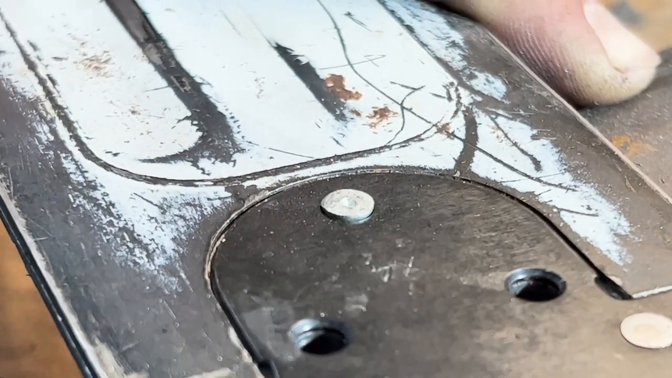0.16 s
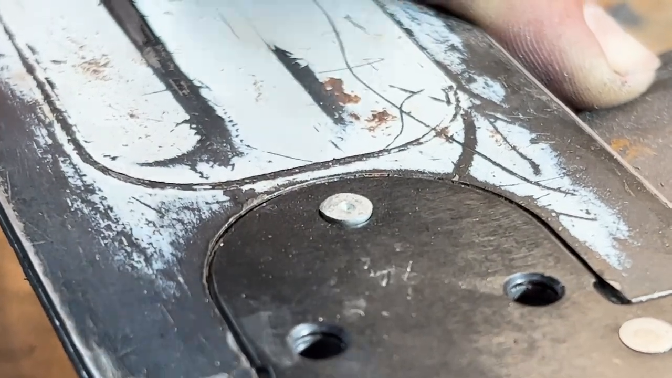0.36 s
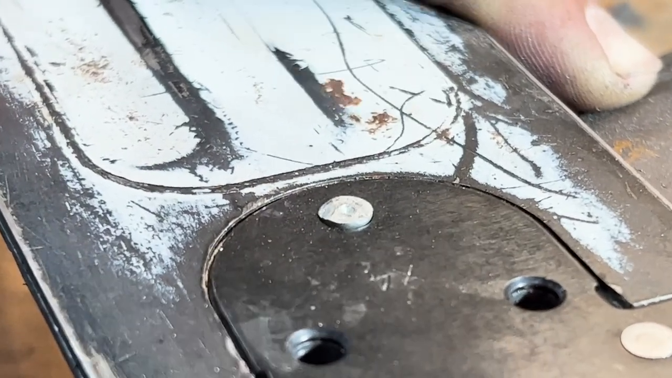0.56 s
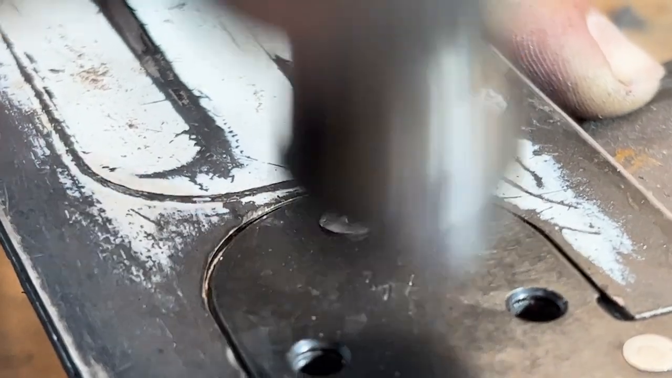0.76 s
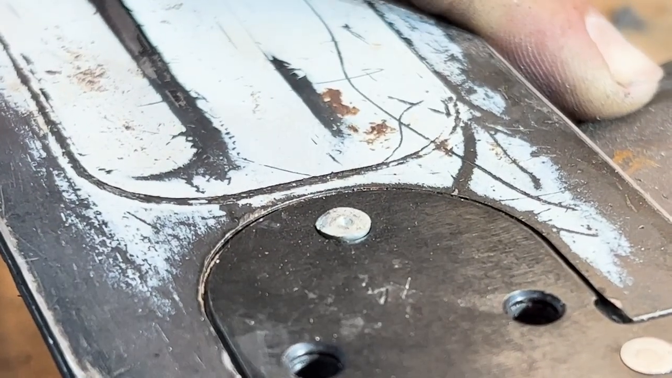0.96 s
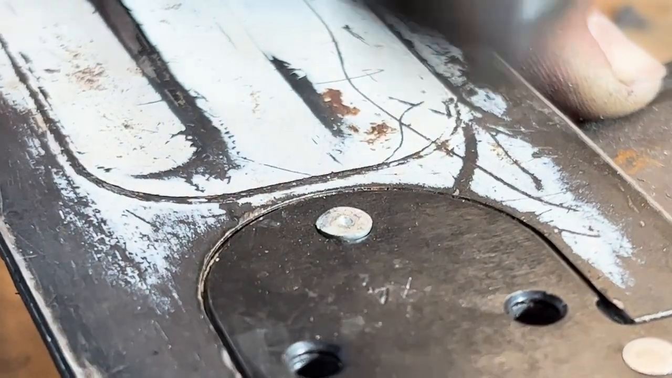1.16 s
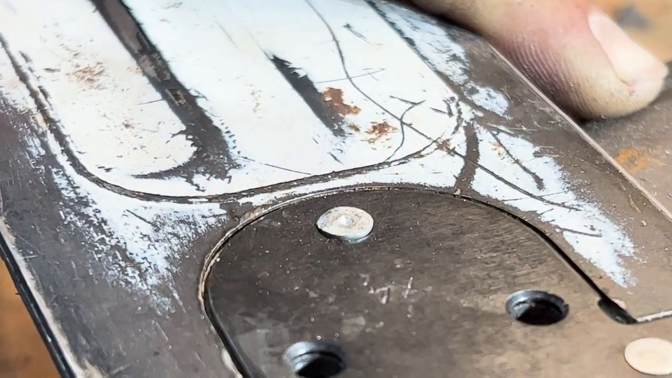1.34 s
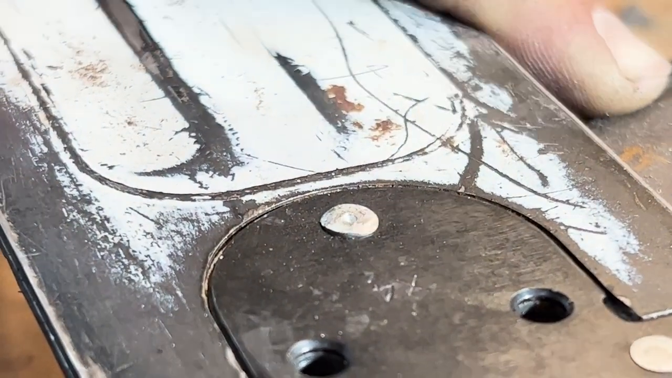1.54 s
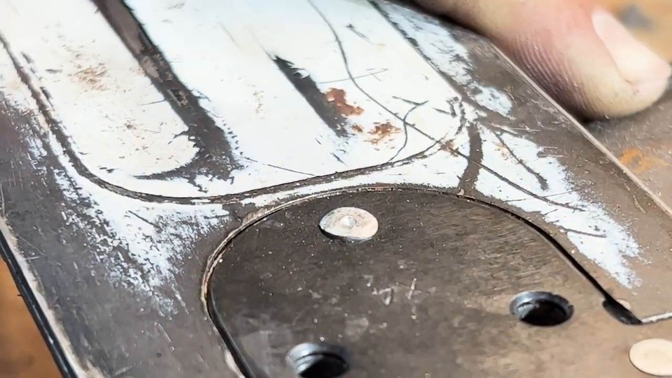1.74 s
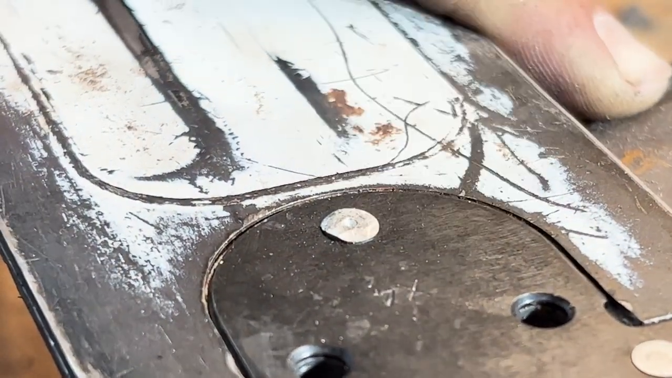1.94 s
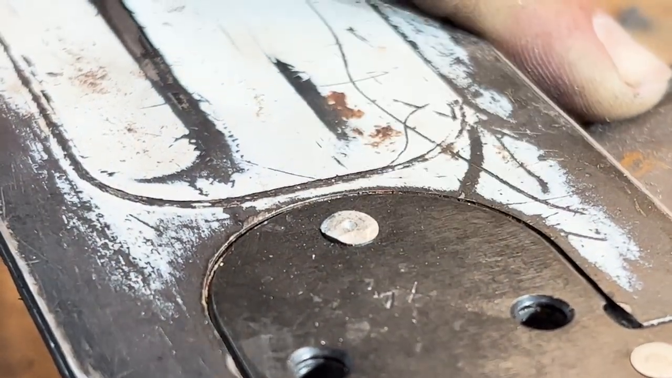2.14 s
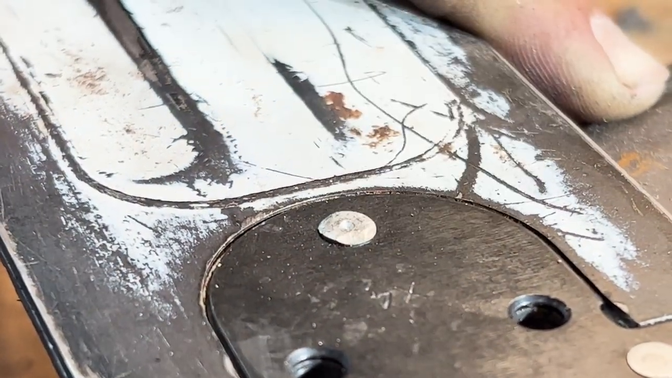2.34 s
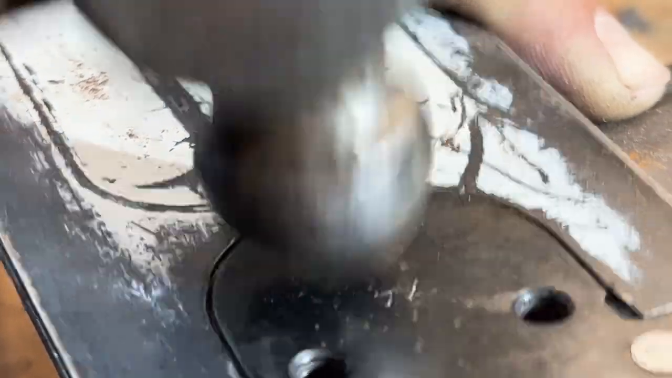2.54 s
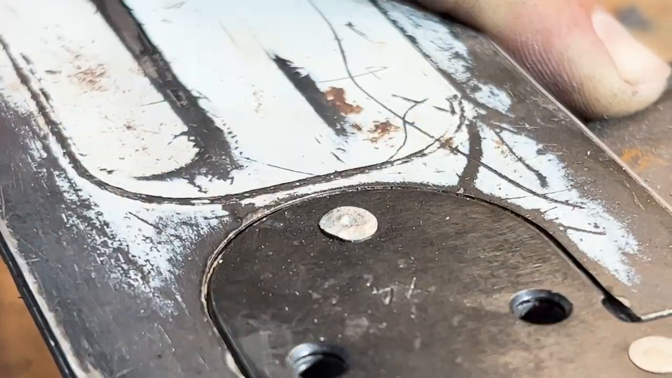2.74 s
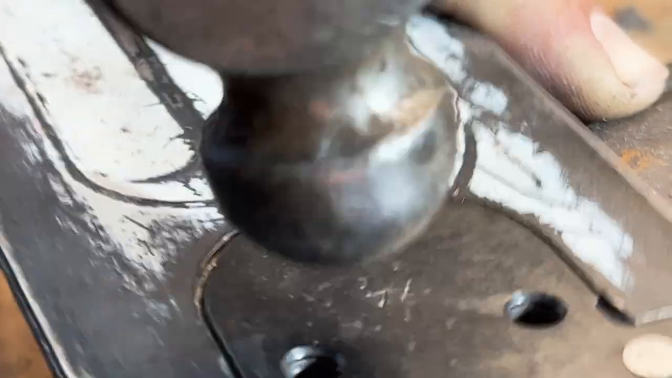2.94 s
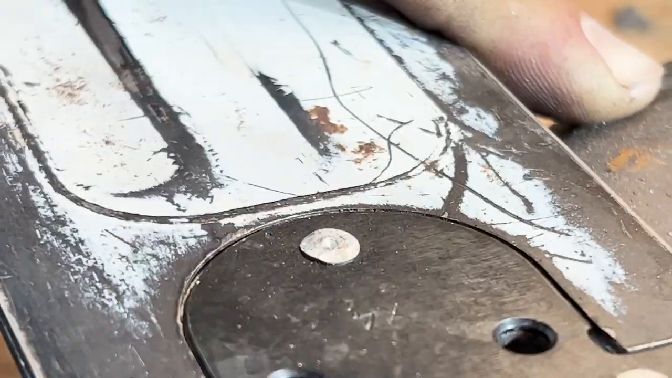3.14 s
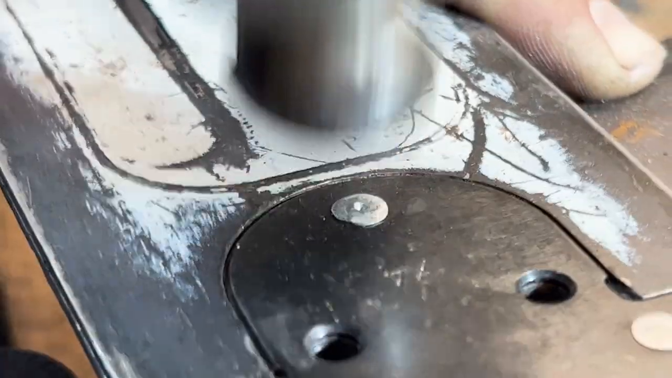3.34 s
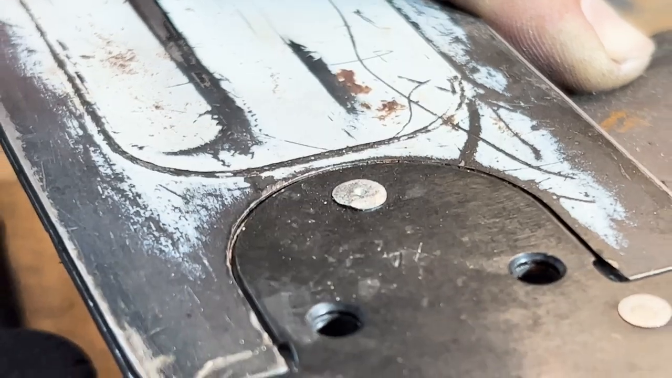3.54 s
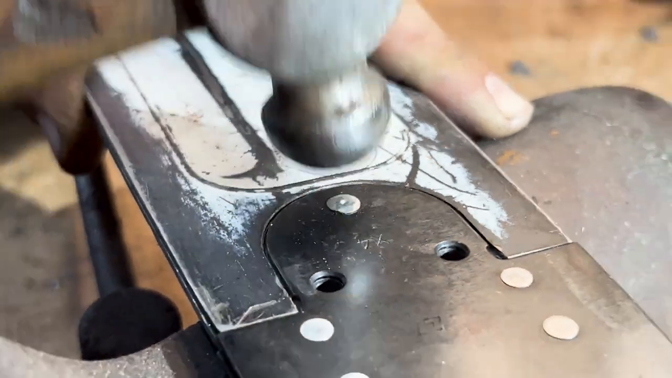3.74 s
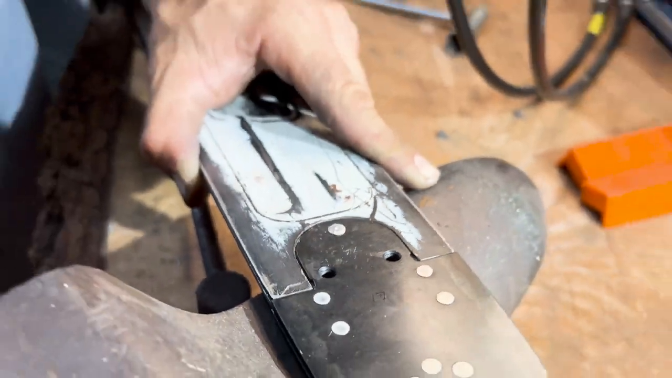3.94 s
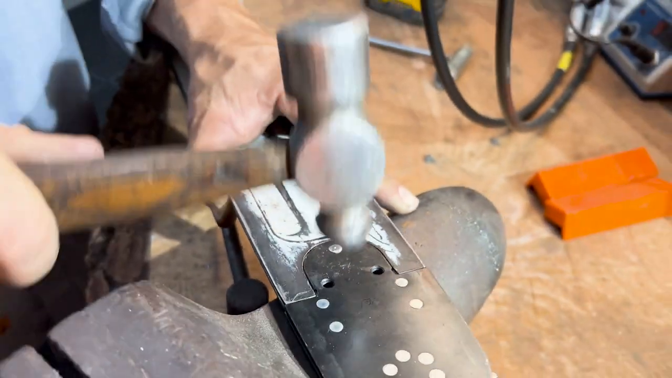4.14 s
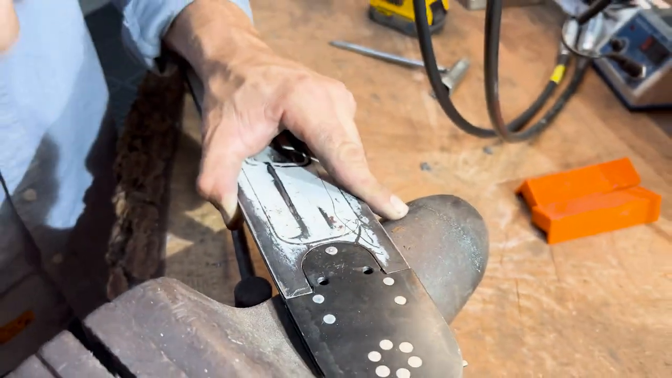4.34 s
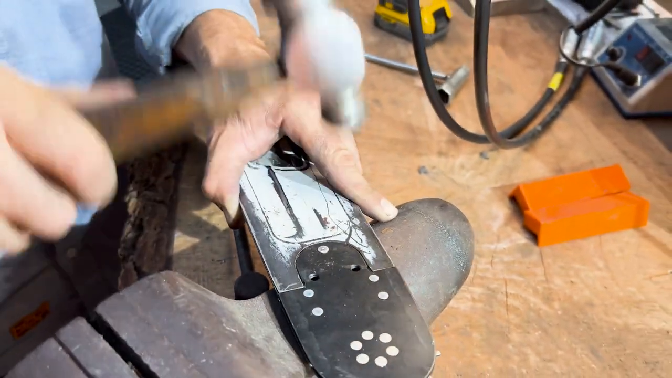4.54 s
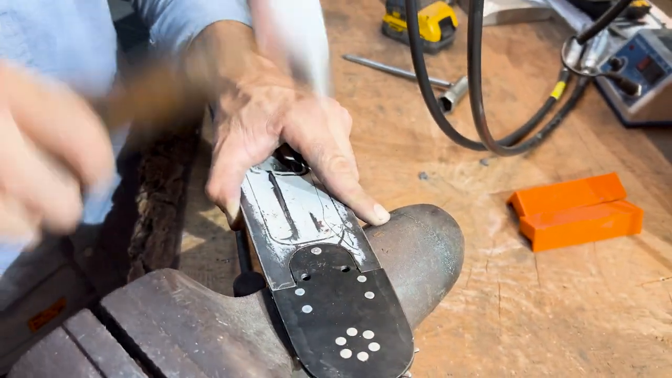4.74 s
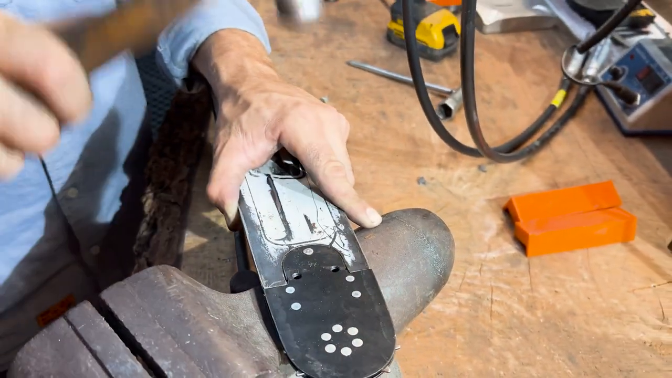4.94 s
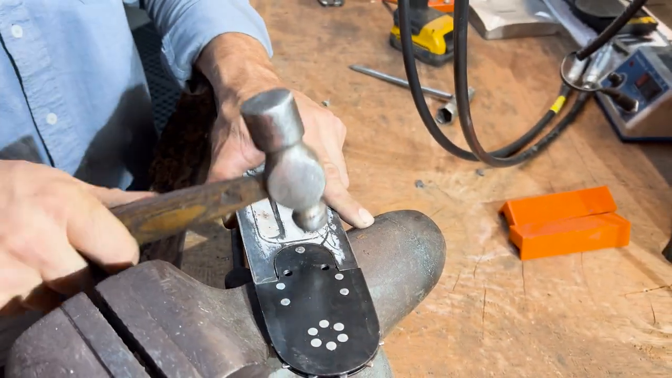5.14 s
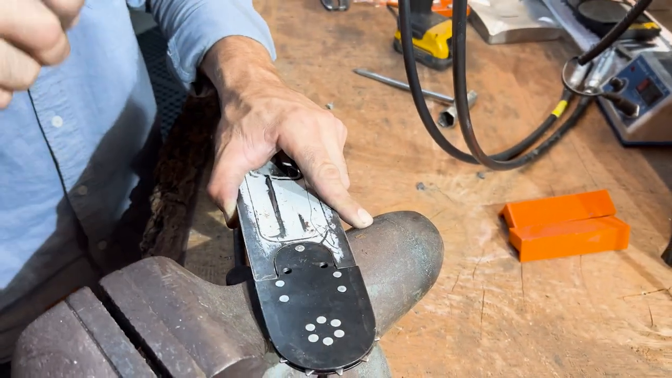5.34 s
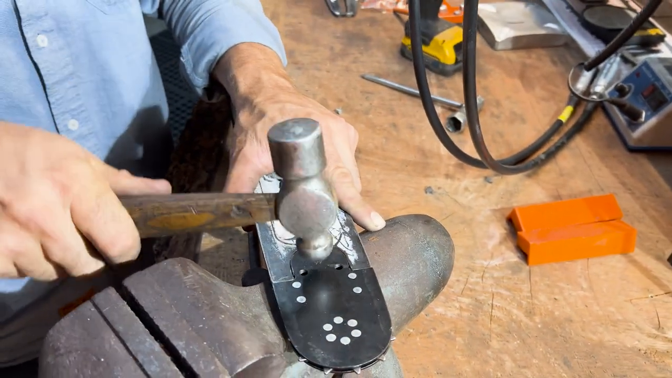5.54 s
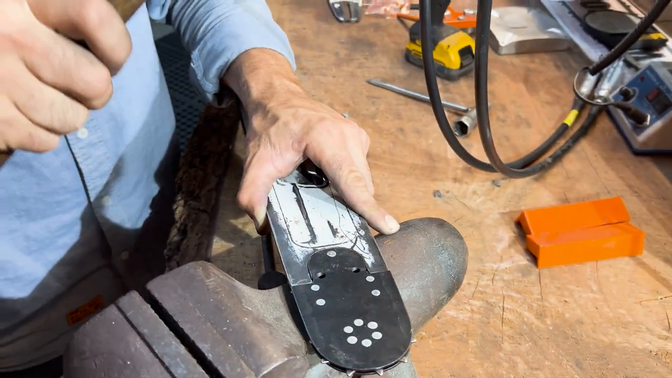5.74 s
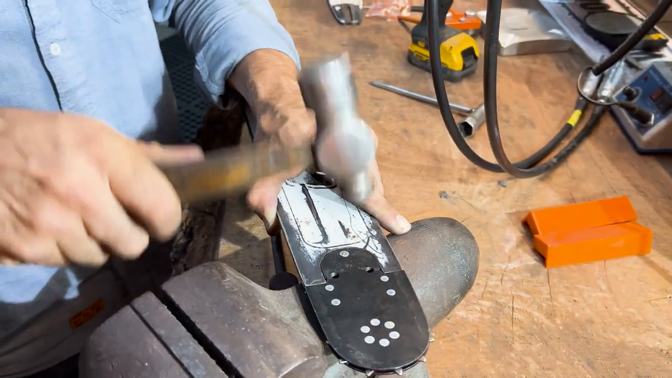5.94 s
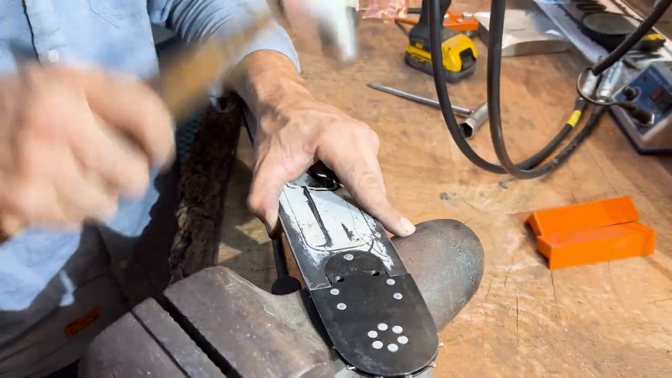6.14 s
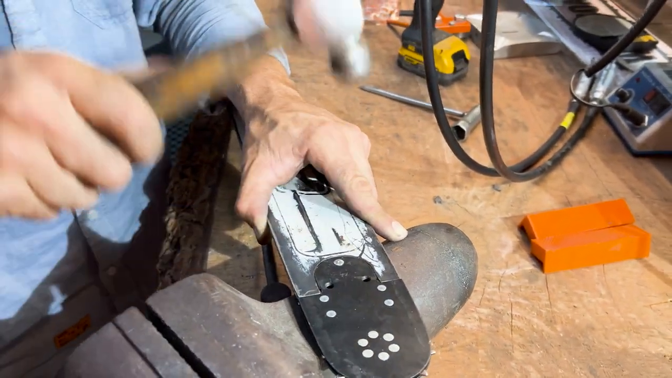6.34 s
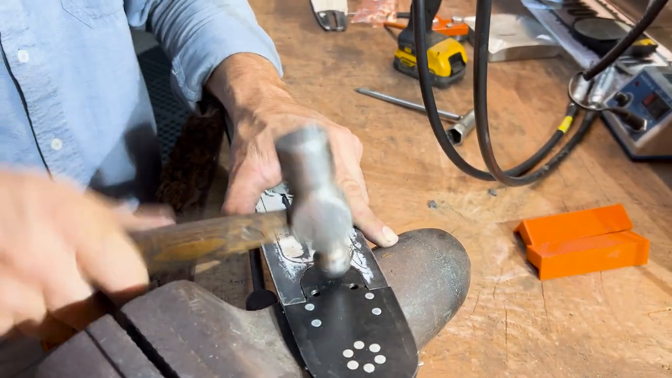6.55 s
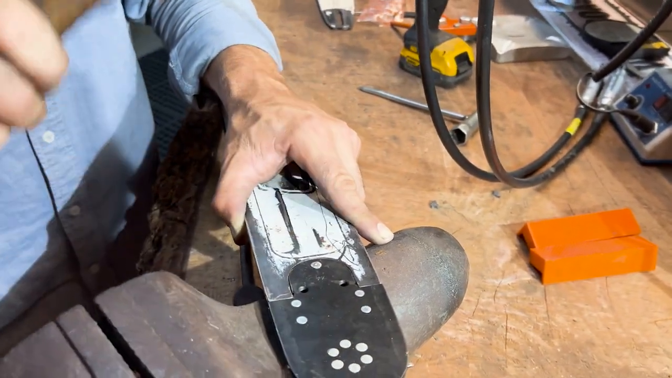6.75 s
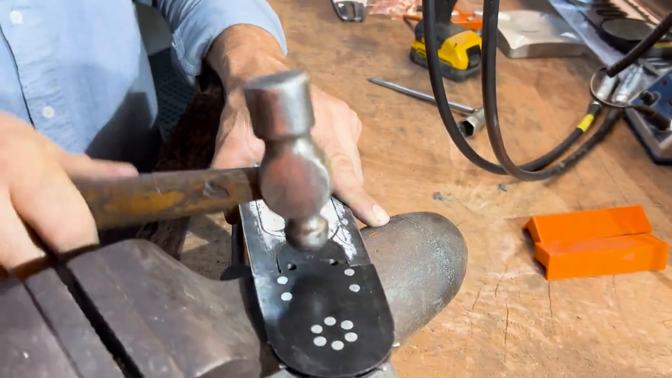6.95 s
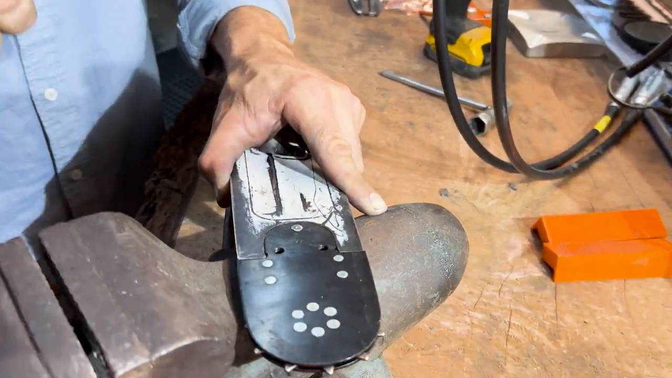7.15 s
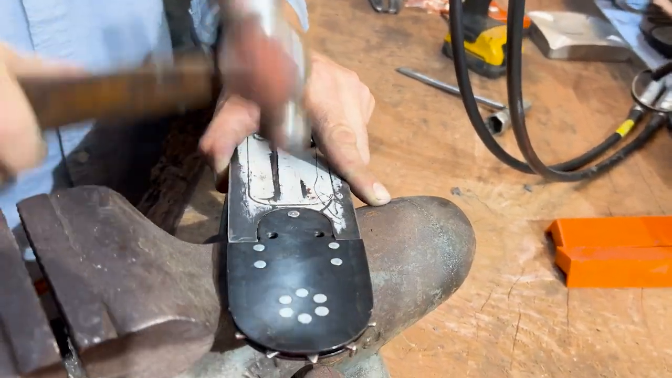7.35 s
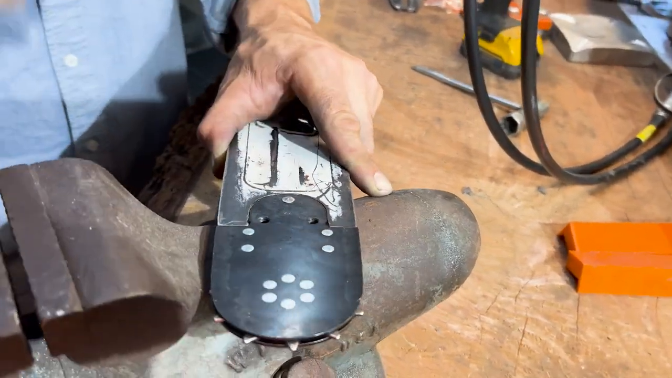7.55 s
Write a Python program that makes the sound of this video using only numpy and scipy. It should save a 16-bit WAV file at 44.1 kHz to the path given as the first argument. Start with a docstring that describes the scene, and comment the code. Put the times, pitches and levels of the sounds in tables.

```python
"""Sharp steel taps, nearly three a second: a ball-peen hammer on a rivet in a flat bar lying on a vise.
Each blow cracks, rings bar and vise, and thumps the wooden bench. The loose bar chatters and, after
most blows, jumps and slaps back; now and then the bench rocks with a low hum. The workshop answers with
a short tail. The microphones listen in a narrow beam, then open wide halfway through."""
import sys
import numpy as np
from scipy import signal
from scipy.fft import rfft, irfft, next_fast_len
from scipy.io import wavfile

SR = 44100
rng = np.random.default_rng(int(sys.argv[2]) if len(sys.argv) > 2 else 0)


def wav_record(signal):
    """Record a signal, one row per channel, as 16-bit PCM in the file named by sys.argv[1]."""
    frames = np.transpose(np.atleast_2d(signal))
    bounded = np.clip(frames, -1, 1)
    # unit amplitude maps onto the largest positive 16-bit level
    quanta = np.round(bounded * 32767).astype(np.int16)
    wavfile.write(sys.argv[1], SR, quanta)


N = 334719

# Noise colours: (frequency [Hz], level per Hz [dB])
AIR_COLOUR = [(30, -25), (60, -3), (100, 0), (360, -2), (1000, -6), (3000, -22), (7000, -34), (9000, -50),
              (16000, -70)]  # still room
CRACK_COLOUR = [(150, -13.5), (500, -3.5), (1000, 2), (1700, -6), (3500, -5.5), (6000, -7.5), (9000, -4),
                (13000, -4.5), (15500, -5), (16200, -24.5), (16900, -53)]  # body of the hit
SNAP_COLOUR = [(1500, -30.5), (4000, -17.5), (9000, 2.5), (15500, 5), (16200, -26), (16900, -28.5)]  # first touch of steel on steel
CHATTER_COLOUR = [(150, -6.5), (500, 1.5), (1200, 0), (3300, -7), (7000, -9), (10000, -10), (15500, -15.5),
                  (16500, -47.5)]  # loose bar
# Ringing modes of bar and vise: (frequency [Hz], level [dB], t60 [s])
BAR_MODES = [(790, -20.5, 0.04), (1100, -4, 0.014), (1428, -6, 0.16), (1468, 4.5, 0.037),
             (1512, 1.5, 0.028), (1593, -5.5, 0.023), (1752, -3.5, 0.034), (2930, -9.5, 0.021),
             (3596, -17, 0.01), (3317, -9.5, 0.018), (4500, -20, 0.04), (5920, -15, 0.024),
             (6480, -27, 0.013)]
VISE_MODES = [(210.4, -6.5, 0.078), (279, -4.5, 0.054), (324.3, 0, 0.071), (362.3, 1, 0.096),
              (443, -13, 0.009), (577, -8.5, 0.072)]
# Weight of the bench thump: (frequency [Hz], level per Hz [dB])
THUMP_COLOUR = [(20, -33), (45, 3), (85, 7), (200, -7), (400, -21.5), (1000, -49)]
# Workshop tail: (frequency [Hz], t60 [s], level [dB])
ROOM_TAIL = [(30, 0.77, -3.5), (60, 0.19, 0.5), (200, 0.32, 9.5), (342, 0.71, 7), (556, 0.44, 8),
             (1000, 0.96, 4.5), (2500, 0.91, 0.5), (7560, 0.73, -3), (10000, 0.41, -0.5),
             (16000, 0.49, -15)]
# Hits, the last four columns relative to the hit's level:
# (time [s], level [dB], bar ring [dB], bar clink [dB], vise [dB], thump [dB])
HAMMER_BLOWS = [(0.0339, -15, -13.5, -4, -13.5, -14), (0.4058, -13, -14, -11, -22, -22.5),
                (0.7646, -15.5, -10, -13, -11.5, -15), (1.1263, -14.5, -13.5, -12, -11, -21),
                (1.475, -16, -14.5, -9, -15, -30.5), (1.8372, -18, -15.5, 0.5, -10.5, -30.5),
                (2.1956, -15.5, -11, -7, -12, -13.5), (2.5651, -16, -8, -9, -19.5, -37.5),
                (2.9648, -15, -9, -26, -21.5, -25), (3.3776, -15, -10.5, -7.5, -14, -19),
                (3.7278, -14.5, -10, -23, -21.5, -18), (4.1, -22.5, -35.5, -9, -11, -31.5),
                (4.46, -22.5, -42.5, -19.5, -11.5, -16.5), (4.807, -22, -27, -7, -8.5, -23),
                (5.1602, -20, -7.5, -8, -16.5, -30), (5.5147, -22.5, -46, -6, -12, -18.5),
                (5.8738, -22.5, -32.5, 0.5, -11, -21.5), (6.222, -24.5, -16, -13, -13, -20.5),
                (6.5829, -24, -25, -12, -14, -22), (6.9297, -21, -11, -24, -12.5, -22.5),
                (7.2775, -21.5, -17.5, -20, -9, -16.5)]
AFTER_SOUNDS = [(0.0823, -16.5, -8.5, -15, -24.5, -21.5), (0.4415, -19.5, -4.5, -2.5, -25.5, -9.5),
                (0.8097, -17.5, -14, 4.5, -24, -21.5), (1.1698, -19, -10, -13, -19, -23),
                (1.503, -17.5, -5.5, 5.5, -28, -25), (1.5113, -25, -19, -3.5, -14.5, -22.5),
                (1.5253, -28.5, -26.5, -4, -24.5, -29), (1.8699, -17.5, -7.5, -2.5, -21, -26),
                (2.2357, -16, -9.5, -16.5, -21.5, -27), (2.5765, -24.5, -2.5, 8, -10.5, -38),
                (2.5832, -20.5, -16, -11.5, -36.5, -41), (2.586, -20, -20, 4, -28.5, -33.5),
                (2.5896, -20, -1.5, -1.5, -14, -36.5), (3.0199, -38.5, -8.5, 8.5, -10, -19),
                (3.4187, -21, -6, 3, -21, -12), (3.7645, -20, -2.5, -0.5, -14.5, -18),
                (4.1122, -38.5, -10, -2, 4, -7), (4.511, -29.5, -13, -9, -13.5, -40),
                (5.2012, -39.5, -8, 3, -25.5, -16), (6.2561, -28.5, -15, -1.5, -34, -21),
                (6.5971, -40.5, -16, 5, -0.5, -14)]  # the bar slapping back, or a faint late ring of the vise
# Voicing of each kind of hit, relative to its level: (crack fall in 10 ms [dB], chatter [dB], room [dB])
BLOW_VOICING, AFTER_VOICING = (-26, -20, -18.5), (-11.5, -25.5, -26.5)
# Bench rocking on: (middle [s], half length [s], frequency [Hz], level [dB])
BENCH_SHUDDERS = [(.6, .06, 46, -50), (7.42, .08, 47, -57), (.13, .03, 55, -50)]
# Pick-up patterns: (frequency [Hz], left-right likeness [0-1], left over right [dB], colour [dB])
NARROW_BEAM = [(60, 0.94, 0.5, -3.5), (300, 0.92, -0.5, 3.5), (800, 0.88, 1, 0.5), (1490, 0.95, 0.5, -3),
               (2290, 1, 0, 1), (16000, 1, -1.5, -2.5)]
WIDE_PATTERN = [(60, 0.91, 0, 0.5), (323, 0.78, 0.5, 4), (650, 0.17, 1.5, 4), (3000, 0.14, -0.5, 8),
                (4050, 0.074, 2.5, 8), (4870, 0.065, -1.5, 9.5), (5250, 0.07, 9.5, 4.5),
                (6880, 0.28, -1.5, 11), (7500, .15, 27, -6), (8400, 0.36, 1.5, 2.5), (11240, 1, -0.5, 2),
                (16000, 0.72, 2, 1)]
# Phase between the channels: (frequency [Hz], left lead [rad])
LEFT_LEAD = [(30, 0), (500, .2), (2050, 0), (3300, .6), (5000, .45), (5850, -.65), (6800, -.1), (8300, -1),
             (9300, -2.55), (10200, -3.2), (11500, -4.45), (13000, -6), (14500, -7.2), (16200, -8.9)]
# The microphones open up: (time [s], share of the wide pattern [0-1])
OPENING = [(3.76, 0.15), (3.86, 1)]

WIDE_ROOM_DB, WIDE_CHATTER_DB = 6, 3.5  # the wide pattern hears more workshop and more chatter
DAMP_S, DAMP_DB = 0.016, -14.5  # damping of the bar's ring: time constant and final depth
THUMP_DELAY_S = 0.0032  # from contact to bench top
CLINK_ABOVE_HZ, TOP_HZ = 2500, 16950


def amp(db):
    return 10 ** (np.asarray(db) / 20)


def along(points, hz, column=1):
    """Read a table column along a log frequency axis."""
    table = np.array(points, float)
    return np.interp(np.log(hz + 1), np.log(table[:, 0] + 1), table[:, column])


def filtered(x, response):
    """Shape x with a complex frequency response."""
    size = next_fast_len(x.shape[-1] + 8192)
    return irfft(rfft(x, size) * response(np.fft.rfftfreq(size, 1 / SR)), size)[..., :x.shape[-1]]


def noise(colour, size):
    """Two unrelated coloured noises of rms 1."""
    x = filtered(rng.standard_normal((2, size)), lambda hz: amp(along(colour, hz)))
    return x / np.sqrt(np.mean(x ** 2) + 1e-20)


def onset(t, attack_s=0.00087):
    """The fast front edge of a noise burst."""
    return 1 - np.exp(-t / attack_s)


def still_air():
    """A faint, dark bed of room tone."""
    return amp(-75) * noise(AIR_COLOUR, N)


def steel_crack(t, fall_db):
    """Steel meets steel: a broad burst holds a moment, then drops; its bright snap dies sooner."""
    burst = amp(fall_db * (t / .01) ** 1.4)
    body = amp(-6.5) * noise(CRACK_COLOUR, len(t)) * burst
    snap = amp(-10.5) * noise(SNAP_COLOUR, len(t)) * burst ** 3
    return (body + snap) * onset(t)


def bar_chatter(t, t60=0.18):
    """The loose bar chatters on the vise: a fading rasp of noise."""
    return noise(CHATTER_COLOUR, len(t)) * amp(-60 * t / t60) * onset(t)


def ringing(modes, t, attack_s, detune, lift_db=0):
    """Damped modes, slightly detuned and at new strengths and phases for each hit and path."""
    hz, db, t60 = np.transpose(modes)[..., None]
    strength, phase, drift = rng.standard_normal((3, 2, len(modes), 1))
    hz = hz * (1 + detune * drift)
    envelopes = amp(db + lift_db + 2 * strength - 60 * t / t60)
    partials = envelopes * np.sin(2 * np.pi * hz * t + 1.33 * phase)
    return partials.sum(axis=1) * (1 - np.exp(-(t / attack_s) ** 2))


def bar_ring(t, ring_db, clink_db):
    """The bar's low modes ring and its high modes clink; they hold a moment, then are quickly damped."""
    lift_db = np.where(np.array(BAR_MODES)[:, :1] > CLINK_ABOVE_HZ, clink_db, ring_db)
    damping = amp(DAMP_DB * (1 - np.exp(-(t / DAMP_S) ** 2)))
    return damping * ringing(BAR_MODES, t, attack_s=0.0027, detune=0.007, lift_db=lift_db)


def vise_clunk(t):
    """The vise's low modes swell in just behind the bar."""
    return ringing(VISE_MODES, t, attack_s=0.01, detune=0.025)


def bench_thump(t, lag_at_100hz_s=0.0132, slope=0.2908):
    """A bending wave in the bench top: low frequencies travel slowest, so the thud glides down."""
    def bending(hz):
        cycles = lag_at_100hz_s * 100 * (hz / 100) ** slope / slope + hz * THUMP_DELAY_S
        return amp(along(THUMP_COLOUR, hz)) * np.exp(-2j * np.pi * cycles)

    wave = filtered(signal.unit_impulse(len(t)), bending)
    polarity = [[1], [rng.choice([-1, 1])]]  # the second path flips at random
    return wave / np.abs(wave).max() * polarity


def workshop_tail(x):
    """The room answers: each frequency dies at its own speed, with new echoes for every hit."""
    hz, t = np.fft.rfftfreq(256, 1 / SR), np.arange(165) * 128 / SR
    echoes = rng.standard_normal((2, len(hz), len(t), 2)) @ [1, 1j]
    t60, db = along(ROOM_TAIL, hz)[:, None], along(ROOM_TAIL, hz, column=2)[:, None]
    tail = signal.istft(echoes * amp(db - 60 * t / t60), SR, nperseg=256)[1]
    tail *= onset(np.arange(tail.shape[1]) / SR, attack_s=.01)  # the first walls take time to answer
    return signal.fftconvolve(x, tail / np.linalg.norm(tail[0]), axes=1)


def hammering():
    """Every hit layers crack, chatter, bar, vise and thump, and sends them to the room."""
    out, t = np.zeros((2, N + SR)), np.arange(SR // 8) / SR
    hits = [row + BLOW_VOICING for row in HAMMER_BLOWS] + [row + AFTER_VOICING for row in AFTER_SOUNDS]
    for start, db, ring_db, clink_db, vise_db, thump_db, fall_db, chatter_db, room_db in hits:
        wide = np.interp(start, *np.transpose(OPENING))
        crack = steel_crack(t, fall_db)
        chatter = amp(chatter_db + WIDE_CHATTER_DB * wide) * bar_chatter(t)
        bar = bar_ring(t, ring_db, clink_db)
        vise = amp(vise_db) * vise_clunk(t)
        thump = amp(thump_db) * bench_thump(t)
        send = crack + amp(-8) * chatter + amp(-4.5) * bar + amp(-6.5) * vise + amp(3) * thump
        hit = amp(room_db + WIDE_ROOM_DB * wide) * workshop_tail(send)
        hit[:, :len(t)] += crack + chatter + bar + vise + thump
        out[:, round(start * SR):][:, :hit.shape[1]] += amp(db) * hit
    return out[:, :N]


def bench_shudder():
    """After some blows the bench rocks on with a low hum."""
    t, phase = np.arange(N) / SR, np.array([[0], [np.pi / 2]])
    hum = np.zeros((2, N))
    for middle, half_length, hz, db in BENCH_SHUDDERS:
        swell = amp(db) * np.exp(-((t - middle) / half_length) ** 4)
        hum += swell * np.sin(2 * np.pi * hz * (t - middle) + phase)
    return hum


def microphones(paths, pattern):
    """Blend two sound paths to the width, balance, colour and phase lead of a pick-up pattern."""
    size = next_fast_len(N + 8192)
    hz = np.fft.rfftfreq(size, 1 / SR)
    mid, side = rfft(paths, size)
    spread = np.arccos(np.clip(along(pattern, hz), 0, .98)) / 2
    left_right = np.array([[.5], [-.5]])
    stereo = np.cos(spread) * mid + 2 * left_right * np.sin(spread) * side
    gain = amp(along(pattern, hz, column=3) + left_right * along(pattern, hz, column=2))
    lead = np.exp(1j * left_right * along(LEFT_LEAD, hz))
    return irfft(stereo * gain * lead, size)[:, :N]


def scene():
    """The whole workshop, crossfaded from the narrow beam to the wide pattern."""
    paths = still_air() + hammering() + bench_shudder()
    wide = np.interp(np.arange(N) / SR, *np.transpose(OPENING))
    return (1 - wide) * microphones(paths, NARROW_BEAM) + wide * microphones(paths, WIDE_PATTERN)


def record(dry):
    """A brick-wall cut takes off the very top."""
    return filtered(dry, lambda hz: hz < TOP_HZ)


dry = scene()
out = record(dry)
wav_record(out)
```